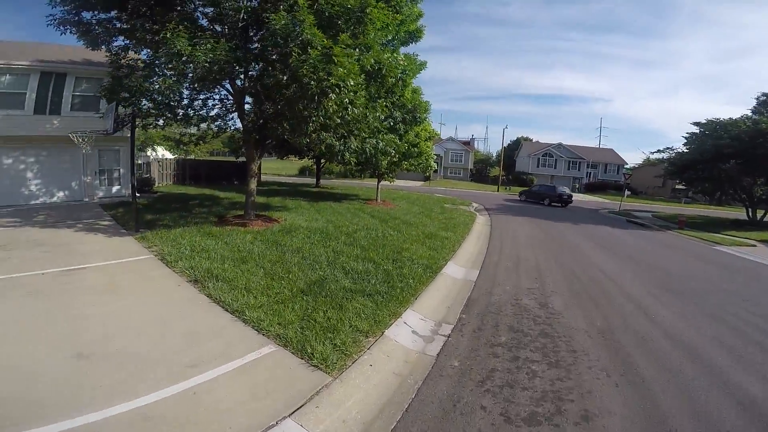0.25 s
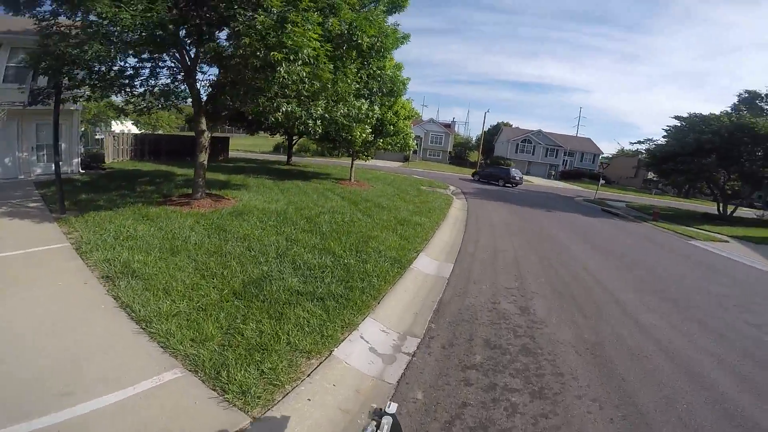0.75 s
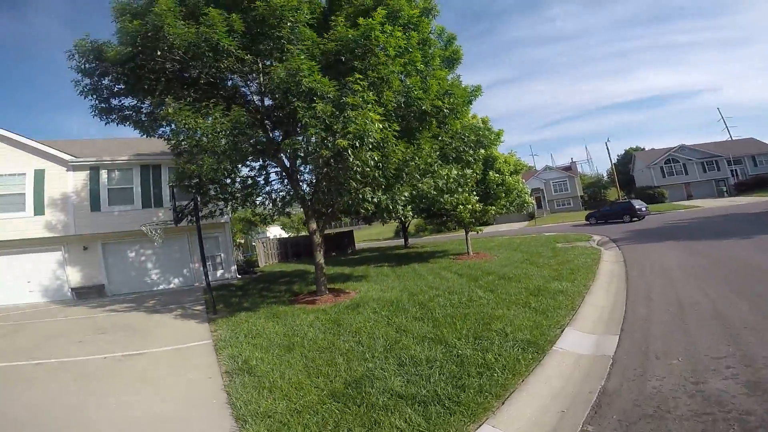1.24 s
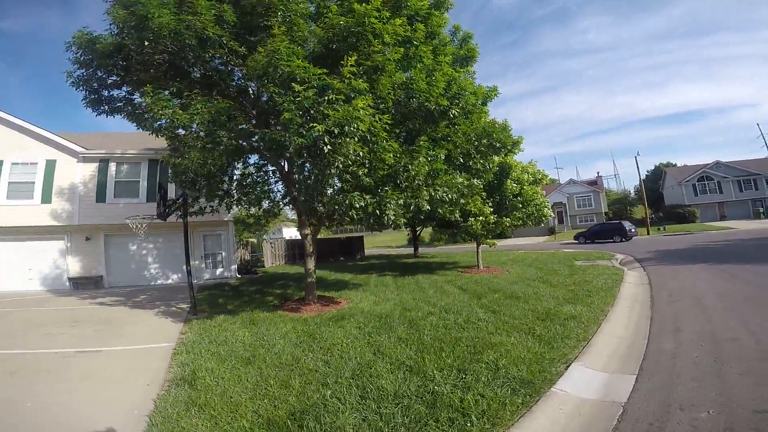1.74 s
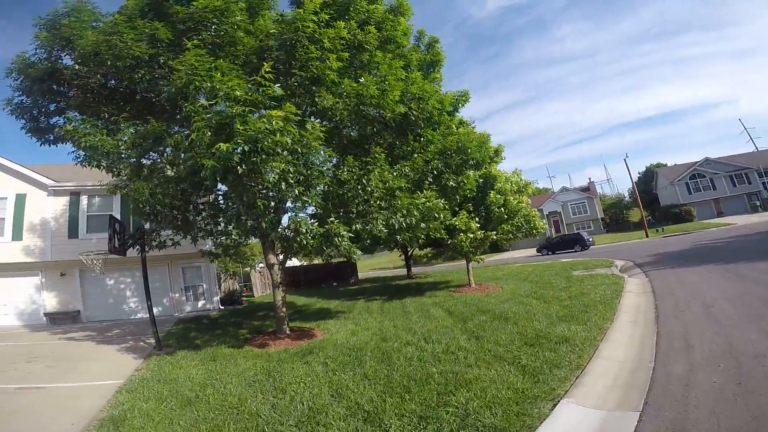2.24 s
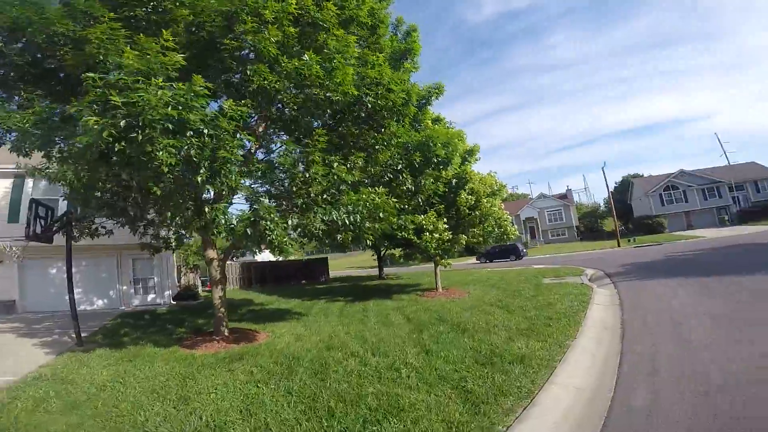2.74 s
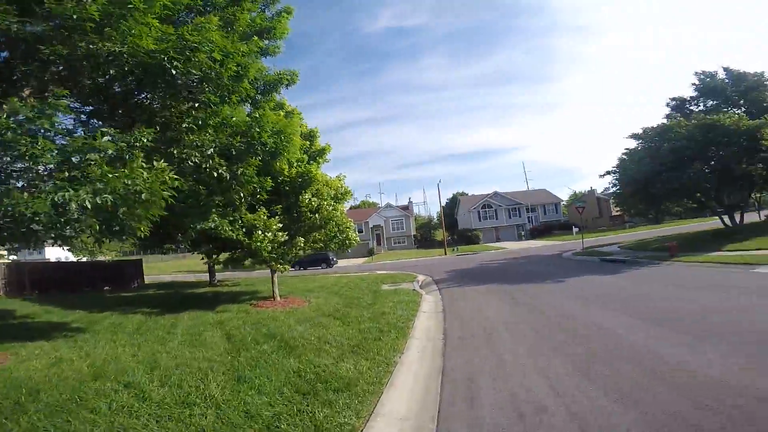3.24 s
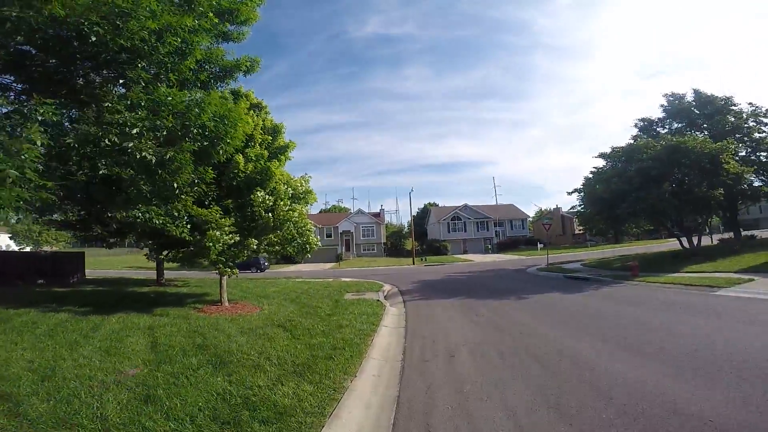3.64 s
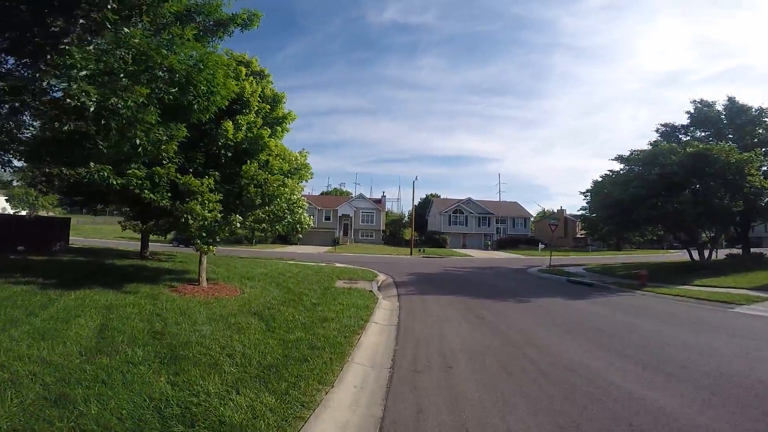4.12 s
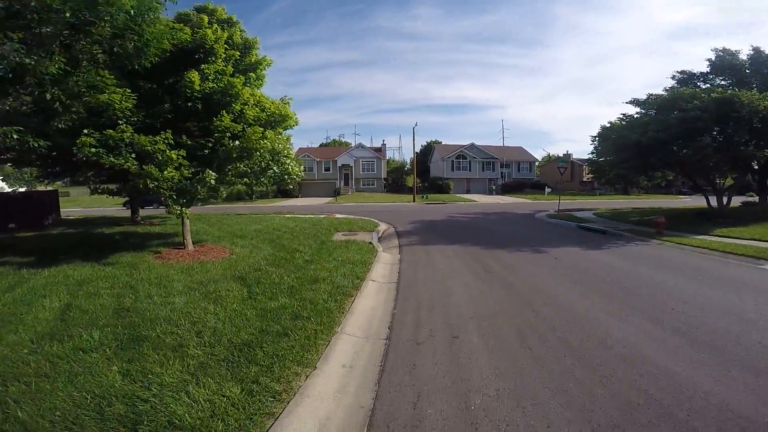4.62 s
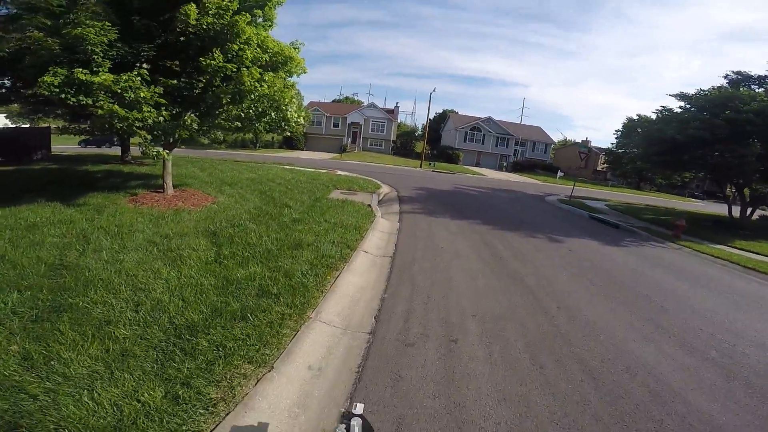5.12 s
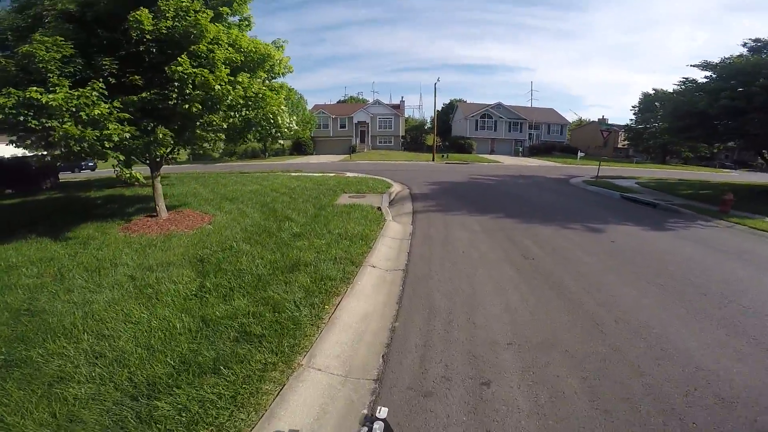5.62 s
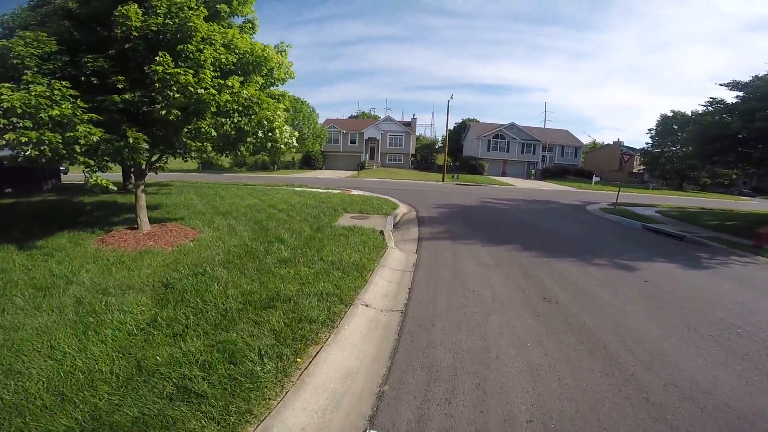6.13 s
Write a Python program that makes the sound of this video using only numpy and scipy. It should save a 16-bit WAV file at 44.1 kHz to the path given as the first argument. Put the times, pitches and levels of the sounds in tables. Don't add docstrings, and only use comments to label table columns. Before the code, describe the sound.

Outdoors on a quiet residential street, a walker carries a small idling petrol garden engine. Sharp metallic cracks, valve ticks and loose clatter ride over soft low exhaust thuds. The body-worn microphone in a closed housing takes a deep jolt about twice a second. The engine grows louder, stumbles with a few snaps near the middle, then idles on slightly duller.

```python
import sys
import numpy as np
from scipy import signal
from scipy.fft import rfft, irfft
from scipy.io import wavfile
from scipy.ndimage import uniform_filter1d

SR = 44100
rng = np.random.default_rng(int(sys.argv[2]) if len(sys.argv) > 2 else 0)


def gain_from_db(level_db):
    decades = np.asarray(level_db, float) / 20
    return 10 ** decades


def wav_record(signal):
    frames = np.transpose(np.atleast_2d(signal))
    bounded = np.clip(frames, -1, 1)
    quanta = np.round(bounded * 32767).astype(np.int16)
    wavfile.write(sys.argv[1], SR, quanta)


N = 280917

# frequency in Hz, density in dB per Hz.
STREET_COLOUR = [(60, 4), (130, -20), (200, -11), (400, -6), (800, -12.5), (1500, -20), (6000, -23.5),
                 (10000, -29), (14200, -29)]
# heel crest in seconds, heel level in dB, heel pitch in Hz,
# push-off crest in seconds, push-off level in dB.
STEPS = [(-0.0108, -4.5, 32.4, 0.099, -13), (0.555, -5.5, 30.3, 0.665, -14), (1.109, -6.5, 31, 1.23, -14),
         (1.684, -7, 36.7, 1.791, -13), (2.224, -6, 34.4, 2.336, -11.5), (2.795, -6.5, 37.2, 2.905, -14.5),
         (3.334, -8, 39, 3.511, -17.5), (3.91, -7.5, 31.6, 3.989, -12.5), (4.46, -7, 34, 4.576, -15),
         (5.035, -9, 34.3, 5.146, -14.5), (5.582, -7.5, 39.2, 5.736, -21),
         (6.161, -8.5, 36.5, 6.248, -13.5)]
# crest in seconds, level in dB, pitch in Hz.
SWING_IN = [(0.437, -16, 48), (1.071, -23, 52), (1.558, -15, 39), (2.16, -28, 33), (2.656, -24, 49),
            (3.19, -22, 45), (3.792, -16, 43), (4.389, -28, 38), (4.911, -17, 40), (5.468, -23, 32),
            (6.041, -14.5, 42)]
# delay from the heel in seconds, level in dB, pitch in Hz, length in cycles.
AROUND_HEEL = [
    (-.037, -19.5, 39.5, 0.73),
    (.034, -20.5, 23.44, 2.02),
]
# delay from the push-off in seconds (negative, so well before it),
# level in dB, pitch in Hz, length in cycles.
STRAY_JOLT = (-1.45, -27, 41.5, 1.2)
# start in seconds,
# crack peak in dB, low casing modes in dB re crack.
PACE = [(0.047, -41, 2), (0.327, -32.5, -9), (0.6045, -40, 2), (1.001, -32.5, -6), (1.37, -35.5, 2),
        (1.4731, -32, -5), (1.6574, -29, -3.5), (1.8651, -28.5, -1), (2.2361, -29.5, -6),
        (2.436, -30.5, -12), (2.621, -35, -4), (2.7288, -31, -8), (2.823, -61, -10), (2.9014, -29, -5),
        (2.9964, -25, -6.5), (3.1659, -31.5, -6), (3.4606, -34, 6), (3.5615, -34, 6), (3.666, -29.5, -3.5),
        (4.0444, -34, 0), (4.4272, -29.5, -13), (4.7049, -32.5, 0), (4.9065, -34, -9.5), (5.178, -41, -13),
        (5.4771, -31, -15), (5.5694, -35.5, -4.5), (5.7746, -33.5, -15), (6.1456, -39.5, -8),
        (6.2389, -32, -5), (6.34, -31, -6)]
# share of the cycle, silencer level in dB, air box level in dB, puff in dB.
BREATHS = [
    (.12, -85, -49, -65.5),
    (.49, -44, -51, -48),
    (.61, -49, -45, -48.5),
]
# share of the cycle, level in dB re crack.
VALVES = [
    (.16, -16.5),
    (.375, -8.5),
    (.635, -11.5),
    (.70, -15.5),
    (.905, -8),
]
# share of the cycle, level in dB.
CLATTER_CYCLE = [(0, 5), (.12, 1.5), (.35, 1), (.53, -4), (.7, 0), (.85, -2.5), (.97, -2), (1, -2)]
# time in seconds, clatter level in dB.
FACING = [(0.0, -46.5), (0.51, -46.5), (0.78, -48), (0.99, -48), (1.45, -42.5), (1.93, -42), (2.77, -44),
          (3.07, -43), (3.23, -46), (3.39, -47), (3.92, -44), (4.68, -46.5), (5.8, -47), (6.19, -45.5),
          (6.37, -50)]
# start in seconds, level in dB.
SNAPS = [
    (2.748, -35.5),
    (2.801, -39),
    (2.845, -41),
    (2.865, -39.5),
    (2.92, -38),
]
# Low, high and top modes of a snap, each in dB re snap.
SNAP_GROUPS_DB = (-7, -5, -17)
# frequency in Hz, width in Hz, level in dB.
MAIN_MODES = [(1207, 88, -11), (2560, 114, -3.5), (2790, 120, 2.5), (3172, 310, 3), (3640, 143, -4),
              (3770, 103, 0), (4010, 244, -4.5), (4260, 18, 1)]
LOW_MODES = [(1674, 67, -12.5), (1745, 350, -6), (1919, 215, 0)]
HIGH_MODES = [(4896, 123, 0.5), (5170, 346, -0.5), (5524, 90, -1.5), (5644, 230, -2.5), (6080, 2500, -12.5)]
TOP_MODES = [(7190, 96, -0.5), (7660, 100, 5), (8460, 200, -2), (9270, 520, -3), (9570, 220, 0.5),
             (10740, 1030, -5.5), (13500, 800, -8), (14200, 500, -18)]
# frequency in Hz, share.
SHADE_SHARE = [(3400, -0.062), (3770, 1), (4000, -0.82), (6900, 0.36), (7600, -1.3), (8800, -0.3)]
# frequency in Hz, width in Hz.
HOUSING_NOTCHES = [(2160, 540), (3420, 158), (4720, 410), (7450, 420), (8600, 450)]


def unit(x):
    return x / np.sqrt(np.mean(x ** 2) + 1e-20)


def band(x, lo_hz, hi_hz, order=2):
    return signal.sosfilt(signal.butter(order, [lo_hz, hi_hz], "band", fs=SR, output="sos"), x)


def resonance(x, hz, width_hz):
    r = np.exp(-np.pi * width_hz / SR)
    gain = (1 - r * r) / 2
    return signal.lfilter([gain, 0, -gain], [1, -2 * r * np.cos(2 * np.pi * hz / SR), r * r], x)


def strike(times, gains, shape):
    times, train = np.asarray(times), np.zeros(N)
    at = np.clip((times * SR).astype(int), 0, N - 1)
    np.add.at(train, at, gains * (times < N / SR))
    return signal.fftconvolve(train, shape)[:N]


def swell(rise_s, fall_s):
    t = np.arange(2600) / SR
    shape = (1 - np.exp(-t / rise_s)) ** 2 * np.exp(-t / fall_s)
    return shape / shape.max()


def drift(rate_hz):
    knots = rng.standard_normal(600)
    return np.interp(np.arange(N) / SR * rate_hz, np.arange(600), knots) * 0.52


def uneven(level_db, spread_db, count):
    return gain_from_db(level_db + spread_db * rng.standard_normal(count))


def street():
    hz = np.arange(N // 2 + 1) * SR / N + 1
    knot_hz, knot_db = np.transpose(STREET_COLOUR)
    colour_db = np.interp(np.log(hz), np.log(knot_hz), knot_db, left=-40)
    return gain_from_db(-62) * unit(irfft(rfft(rng.standard_normal(N)) * gain_from_db(colour_db), N))


def jolts():
    rows = [(*swing, 0.62) for swing in SWING_IN]
    for heel_s, heel_db, heel_hz, push_s, push_db in STEPS:
        rows.append((heel_s, heel_db, heel_hz, 0.68))
        rows.append((push_s, push_db, 34, 1.4))
        rows.append((push_s + STRAY_JOLT[0], *STRAY_JOLT[1:]))
        rows += [(heel_s + delay_s, *rest) for delay_s, *rest in AROUND_HEEL]
    return rows


def steps():
    t, swings, shake = np.arange(N) / SR, np.zeros(N), np.zeros(N)
    for s, jolt_db, hz, turns in jolts():
        near = slice(max(0, int((s - .3) * SR)), int((s + .3) * SR))
        since = t[near] - s
        skew = np.where(since < 0, .7, 1)
        bell = gain_from_db(jolt_db) * np.exp(-.5 * (since * hz / max(turns, .2) / skew) ** 2)
        swings[near] += bell * np.cos(2 * np.pi * hz * since)
        shake[near] += bell
    run_in = rng.standard_normal((2, N + SR))
    rumble = unit(band(run_in[0], 20.9, 49.1, order=3)[SR:])
    knock = unit(band(run_in[1], 53.2, 80.5, order=3)[SR:])
    rumble_gain = gain_from_db(-35.5) + gain_from_db(-17.5) * uniform_filter1d(shake, 2000)
    knock_gain = gain_from_db(-56) + gain_from_db(-28) * shake ** 1.4
    return swings + rumble * rumble_gain + knock * knock_gain


def firing_times():
    cycle_s = .095
    s = np.array(PACE)[:, 0]
    number = np.r_[0, np.cumsum(np.round(np.diff(s) / cycle_s))].astype(int)
    return np.interp(np.arange(number[-1] + 1), number, s), number


def cycles():
    fire = firing_times()[0]
    start = np.r_[fire[0] - .094, fire]
    return start, np.diff(np.r_[start, fire[-1] + .096])


def exhaust():
    (start, length), t = cycles(), np.arange(1500) / SR
    fire, count = start[1:], len(start)
    held = np.clip(t / 0.0019, 0, 1) * np.clip((.0215 - t) / 0.0066, 0, 1)
    out = strike(fire, uneven(-41.5, 2.0, count - 1), held * np.sin(2 * np.pi * 136 * t))
    bark = np.sin(2 * np.pi * 530 * t) + 1.23 * np.sin(2 * np.pi * 400 * t)
    out += strike(fire, uneven(-39.5, 2.0, count - 1), 0.42 * np.exp(-t / 0.0037) * bark)
    air = unit(band(rng.standard_normal(N), 226, 1460))
    out += air * strike(fire, uneven(-51.5, 2.0, count - 1), swell(0.0011, 0.014))
    silencer = swell(0.0027, 0.0053)[:1500] * np.sin(2 * np.pi * 150 * t)
    air_box = swell(0.00044, 0.0076)[:1500] * np.sin(2 * np.pi * 240 * t)
    for part, silencer_db, box_db, puff_db in BREATHS:
        at = start + part * length
        out += strike(at, uneven(silencer_db, 0.98, count), silencer)
        out += strike(at, uneven(box_db, 1.2, count), air_box)
        out += air * strike(at, uneven(puff_db - 7, 2.0, count), swell(0.00021, 0.0041))
    return out


def facing(t):
    clatter_db = np.interp(t, *np.transpose(FACING))
    turned = np.clip((t - 3.06) / 0.1, 0, 1)
    return clatter_db, clatter_db - 14 - 3.5 * turned


def clatter():
    t, (start, length) = np.arange(N) / SR, cycles()
    share = np.interp(t, np.r_[start, start[-1] + length[-1]], np.arange(len(start) + 1)) % 1
    bursts_db = 2.3 * np.repeat(rng.exponential(1, N // 40 + 1), 40)[:N]
    grains = rng.standard_normal(N) * gain_from_db(2.0 * drift(60) + bursts_db)
    cycle_gain = gain_from_db(np.interp(share, *np.transpose(CLATTER_CYCLE)))
    out = unit(grains * cycle_gain) * gain_from_db(facing(t)[0] + 10.5)
    white = rng.standard_normal(N)
    for part, tick_db in VALVES:
        level = uneven(facing(start)[0] + 22 + tick_db, 2.6, len(start))
        at = start + length * (part + 0.0049 * rng.standard_normal(len(start)))
        out += white * strike(at, level, swell(0.0004, 0.0027))
    return out


def firings():
    s, listed = firing_times()
    clatter_db, bright_db = facing(s)
    usual_db = clatter_db + 13.5
    crack_db = usual_db.copy()
    low_db = -5 + 2 * rng.standard_normal(len(s))
    crack_db[listed], low_db[listed] = np.transpose(PACE)[1:]
    upper_db = bright_db + 0.61 * (crack_db - usual_db) - crack_db
    top_db = upper_db + 8 + .4 * (bright_db + 58)
    return s, crack_db, low_db, upper_db + 19, top_db


def casing():
    t = np.arange(N) / SR
    snaps = [(*snap, *SNAP_GROUPS_DB) for snap in SNAPS]
    s, crack_db, low_db, high_db, top_db = np.c_[np.array(firings()), np.transpose(snaps)]
    clatter_db, bright_db = facing(t)
    bright = bright_db - clatter_db
    white, groups = rng.standard_normal(N), []
    # modes, dB re crack, boost dB, spread dB, lead s, blow gain, hiss gain, answer gain, rattle gain
    settings = [
        (MAIN_MODES, 0, 9.95, 1.24, .0006, 0.015, 0.43, 0.13, 1),
        (LOW_MODES, low_db, 15.14, 1.36, .0014, 0.016, 0.46, 0.069, gain_from_db(-1.5)),
        (HIGH_MODES, high_db, 10.5, 3.2, .0006, 0.0096, 0.76, 0.27, gain_from_db(bright + 1.5)),
        (TOP_MODES, top_db, 6.45, 1.7, .0004, 0.0025, 1.3, 0.14, gain_from_db(0.85 * bright - 17.0))]
    for modes, group_db, boost_db, spread_db, lead_s, blow_gain, hiss_gain, answer, rattle_gain in settings:
        rattle, ringing = rattle_gain * clatter(), np.zeros(N)
        for hz, width_hz, mode_db in modes:
            level = uneven(crack_db + group_db + boost_db, spread_db, len(s))
            late_s = .0007 * np.abs(rng.standard_normal(len(s)))
            tone = np.sin(2 * np.pi * hz * t[:2600])
            blow = swell(0.0011, 0.0015) * tone * blow_gain * np.sqrt(width_hz)
            crack = strike(s - lead_s + late_s, level, blow)
            burst = hiss_gain * swell(0.001, 0.0023) + 0.13 * swell(0.0012, 0.013)
            hiss = white * strike(s, level, burst)
            hiss += white * strike(s + 0.0122, level * answer, swell(0.00083, 0.0028))
            restless = gain_from_db(4.55 * drift(40) + 2.0 * drift(90))
            shade_db = np.interp(hz, *np.transpose(SHADE_SHARE)) * (bright - bright.mean())
            struck = crack + hiss + restless * rattle
            ringing += gain_from_db(mode_db + shade_db) * resonance(struck, hz, width_hz)
        groups.append(ringing)
    main, low, high, top = groups
    heard = band(main + low, 1217, 4050, order=3) + band(high, 4200, 6020) + band(top, 6200, 15000)
    for hz, width_hz in HOUSING_NOTCHES:
        heard = heard - 0.77 * resonance(heard, hz, width_hz)
    return heard


def scene():
    return (street() + steps() + exhaust() + casing())[None]


def low_pass(x):
    return signal.sosfilt(signal.butter(12, 15700, fs=SR, output="sos"), x)


def record(dry):
    mix = signal.sosfilt(signal.butter(16, 15050, fs=SR, output="sos"), dry)
    return low_pass(mix)


dry = scene()
out = record(dry)
wav_record(out)
```